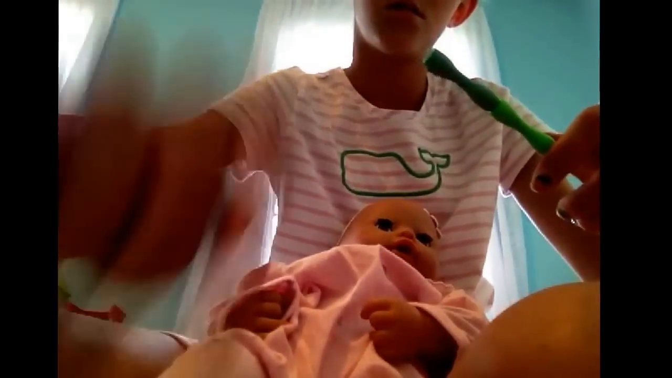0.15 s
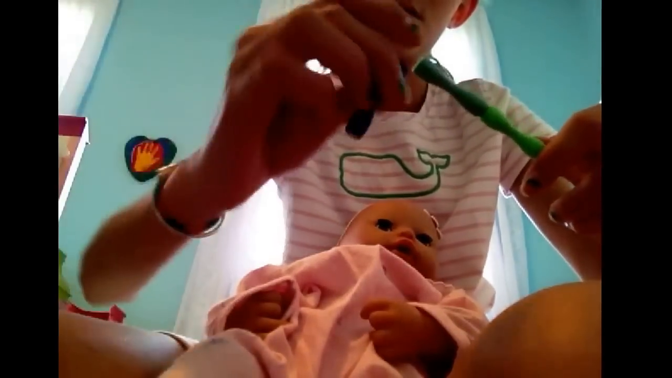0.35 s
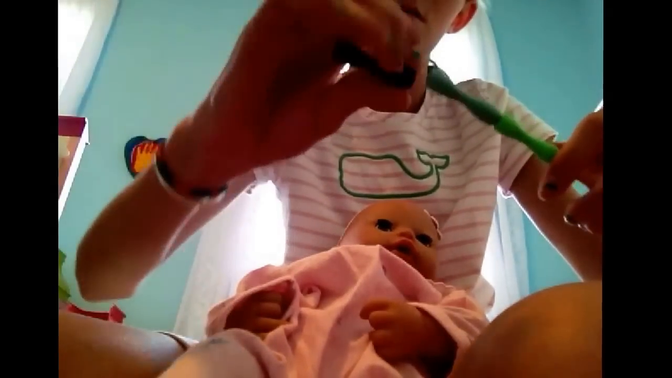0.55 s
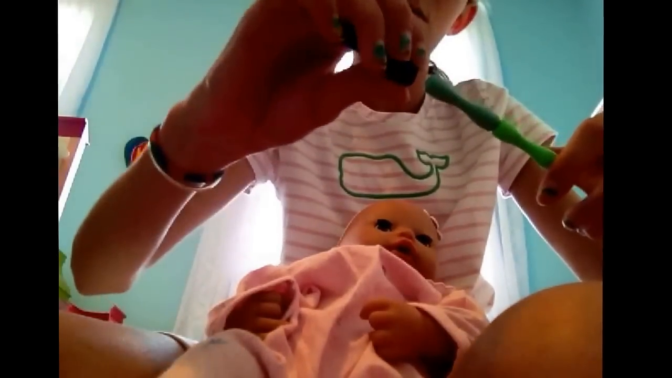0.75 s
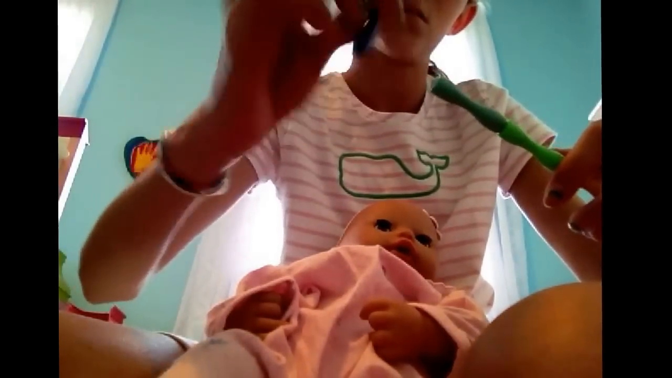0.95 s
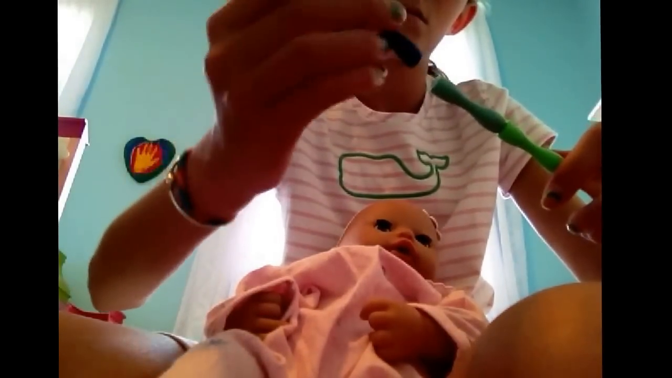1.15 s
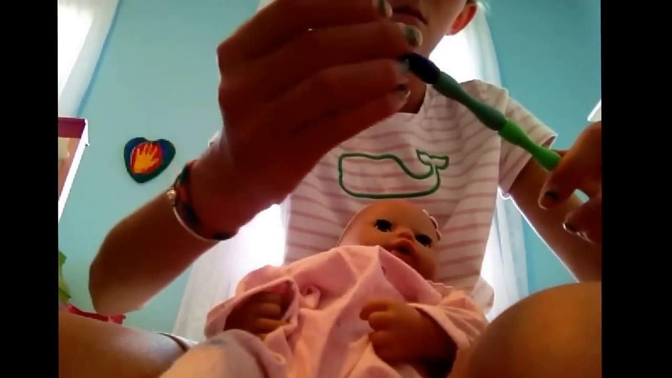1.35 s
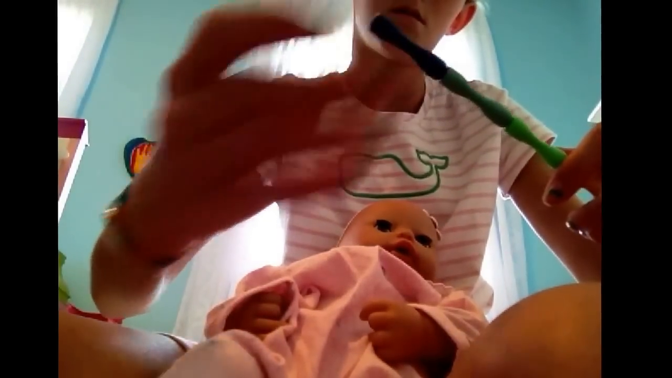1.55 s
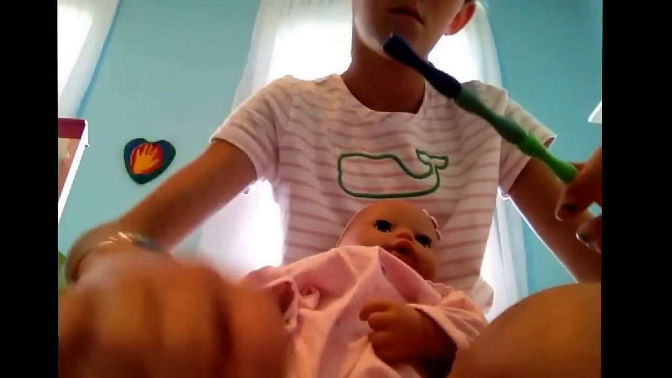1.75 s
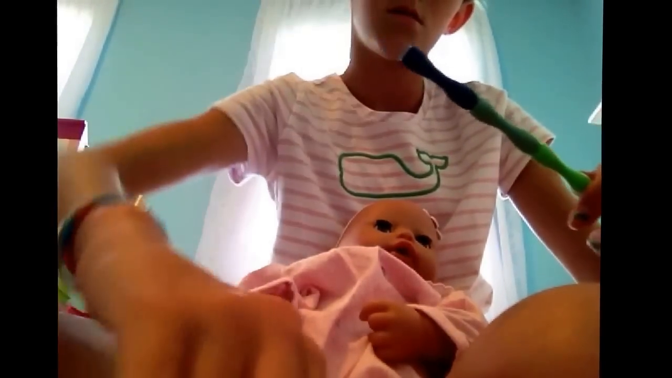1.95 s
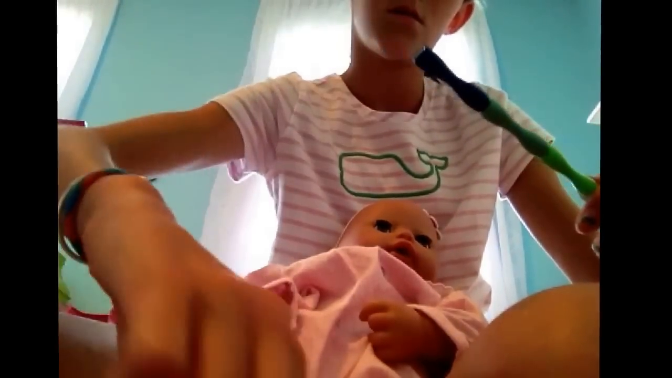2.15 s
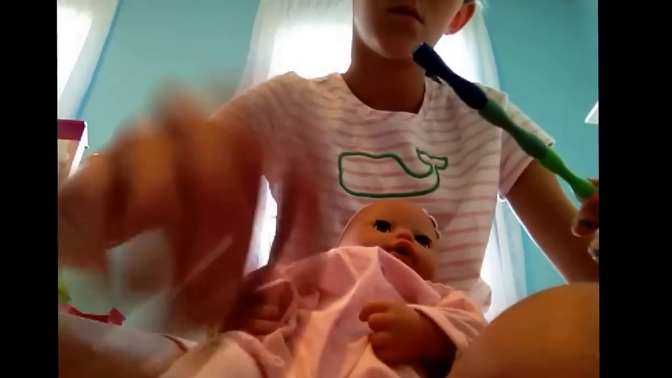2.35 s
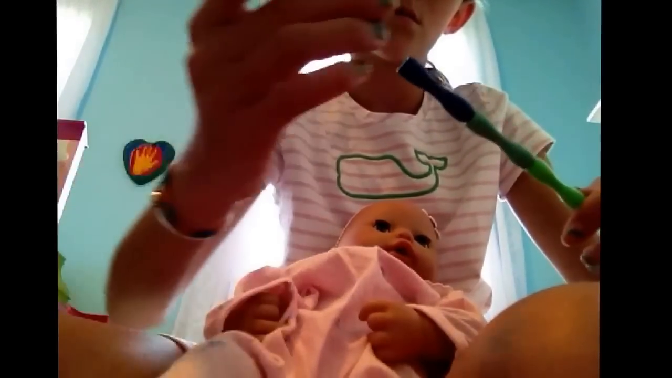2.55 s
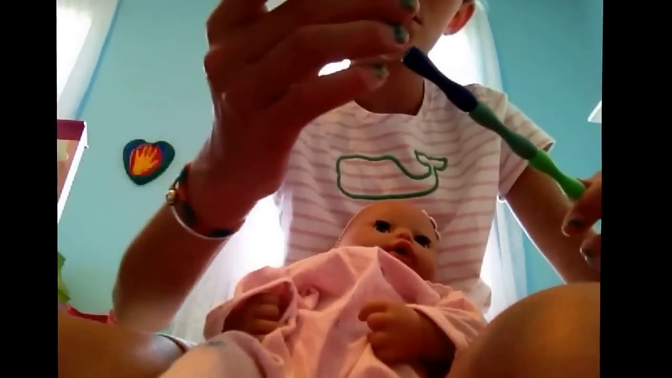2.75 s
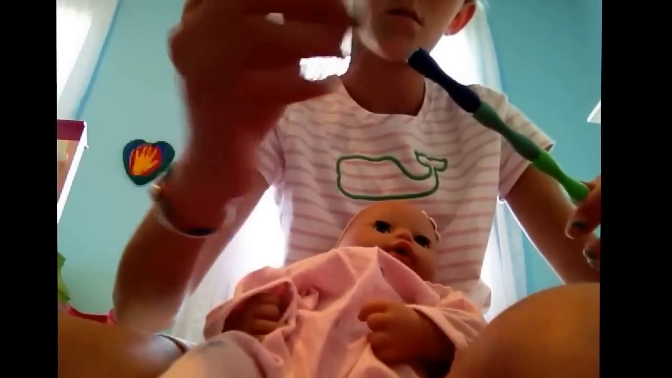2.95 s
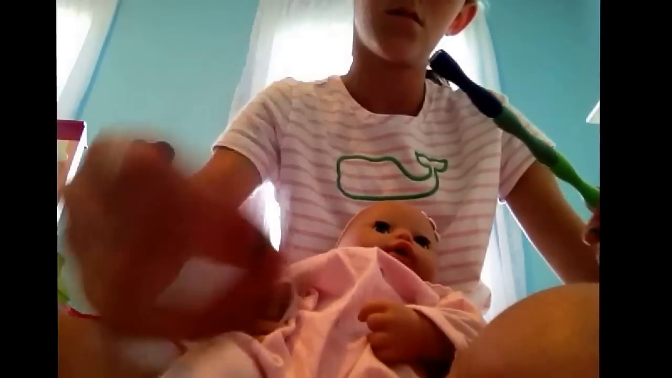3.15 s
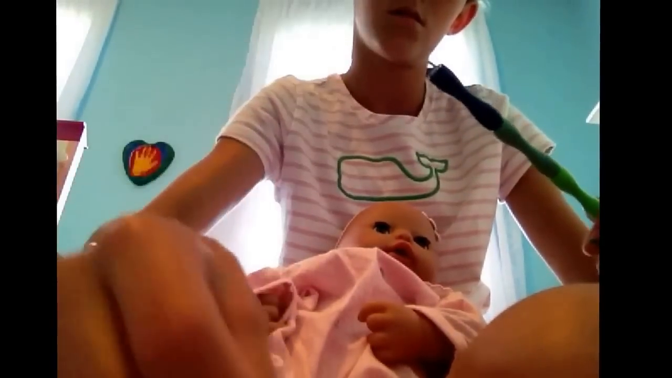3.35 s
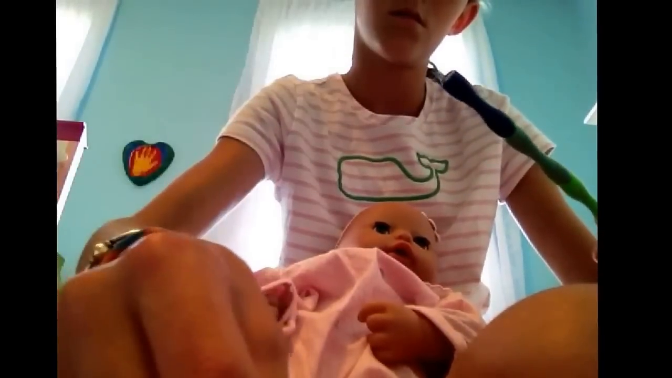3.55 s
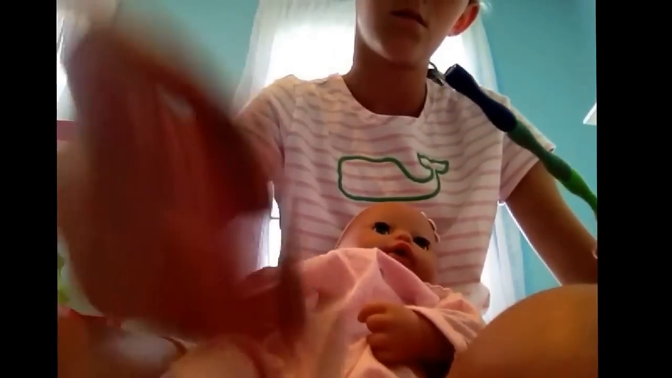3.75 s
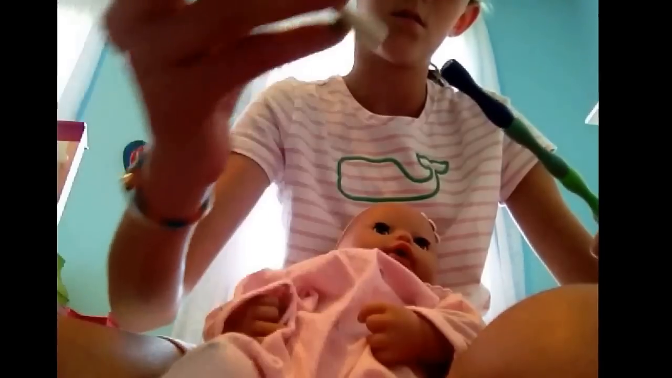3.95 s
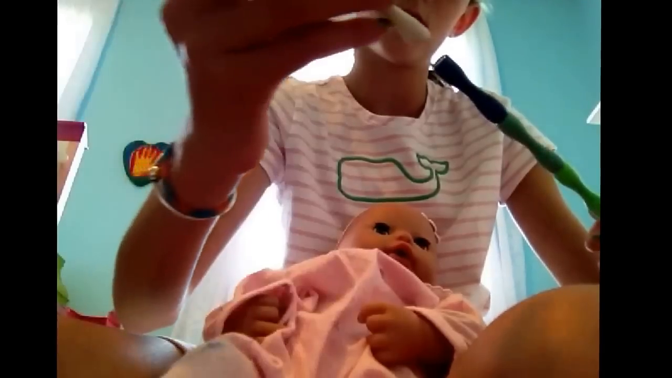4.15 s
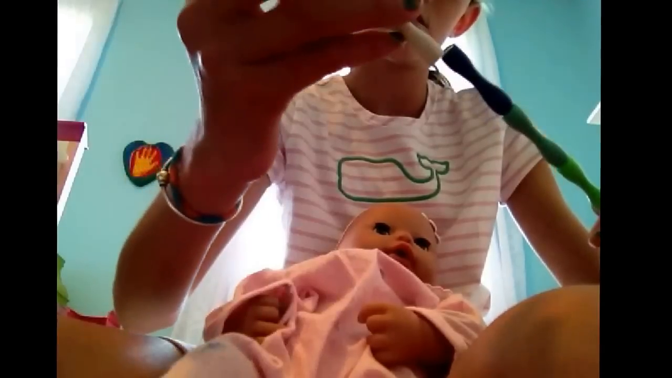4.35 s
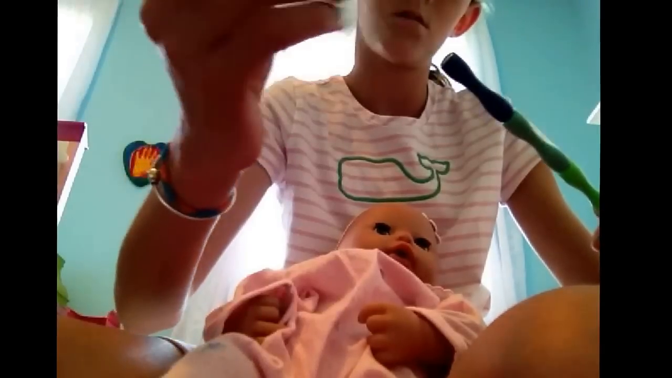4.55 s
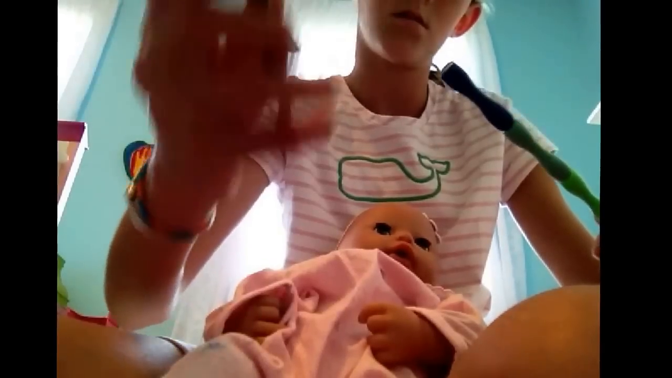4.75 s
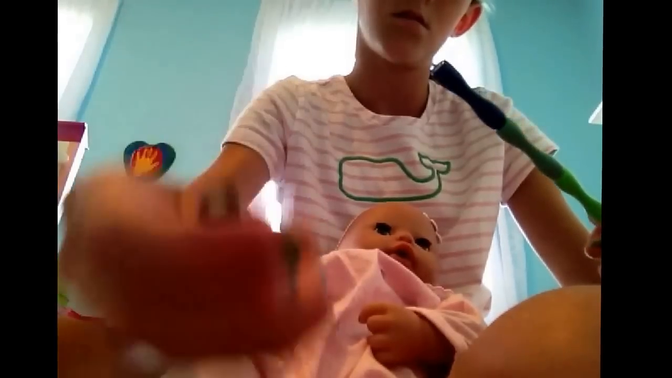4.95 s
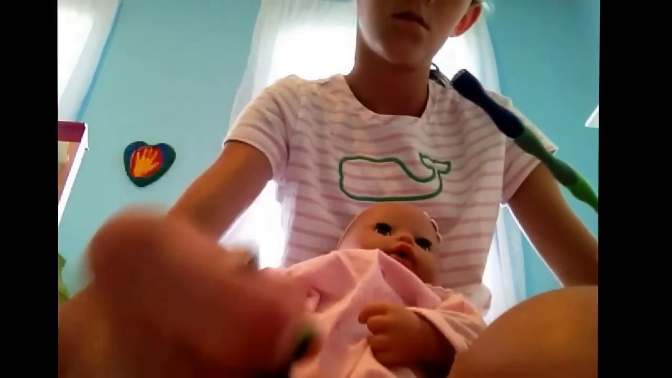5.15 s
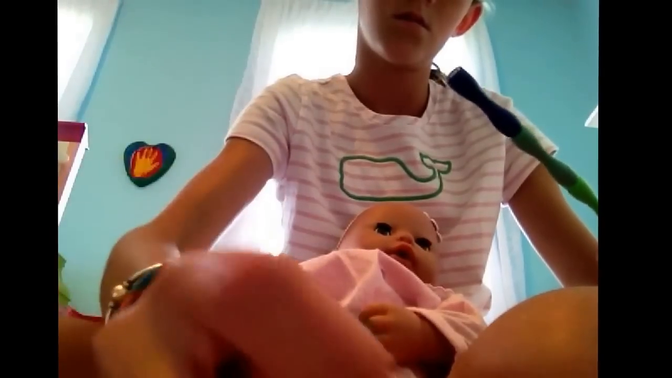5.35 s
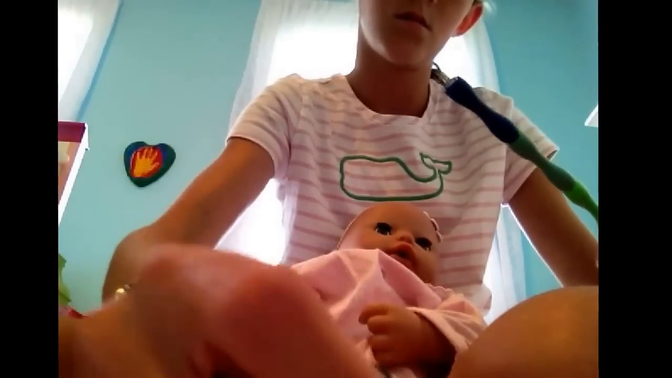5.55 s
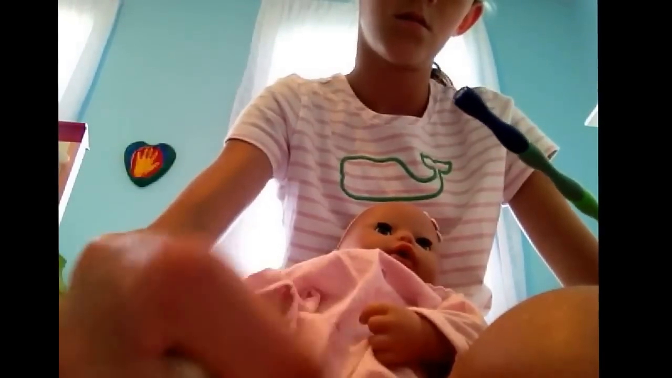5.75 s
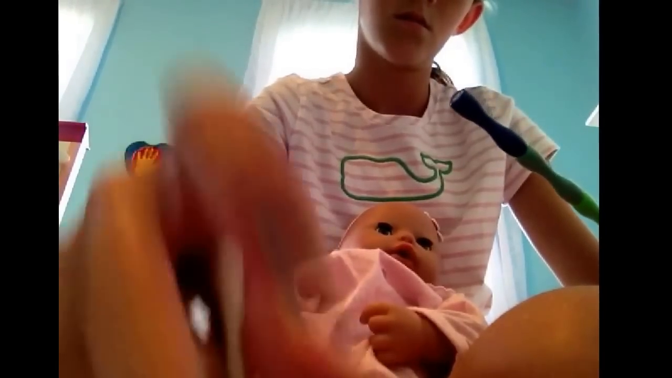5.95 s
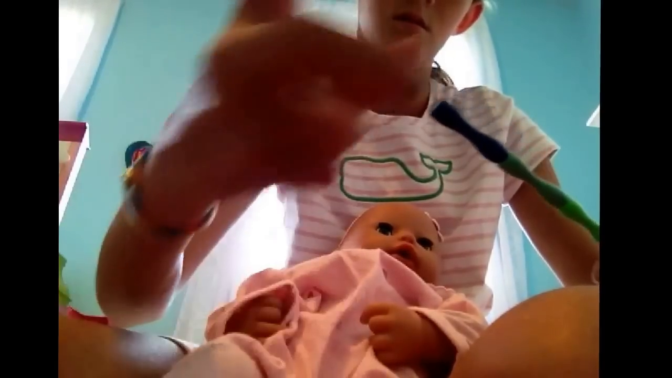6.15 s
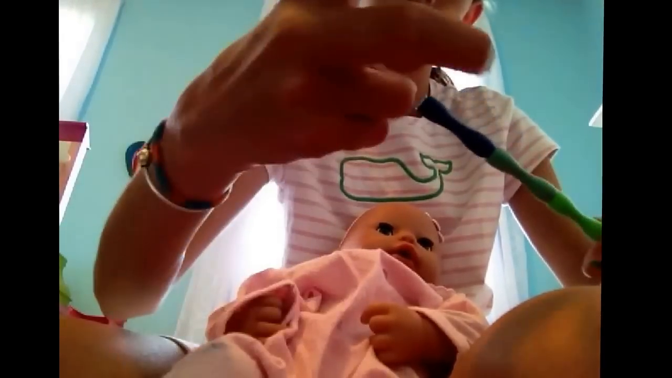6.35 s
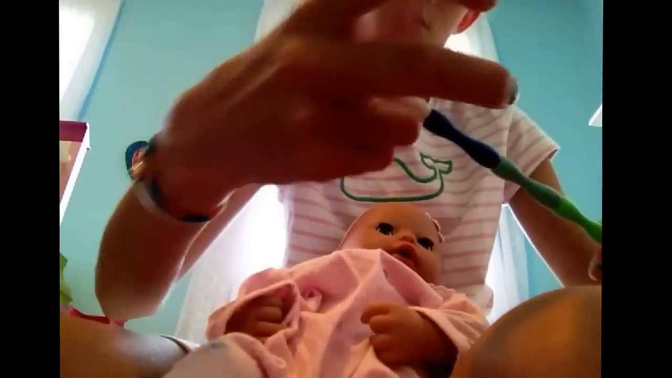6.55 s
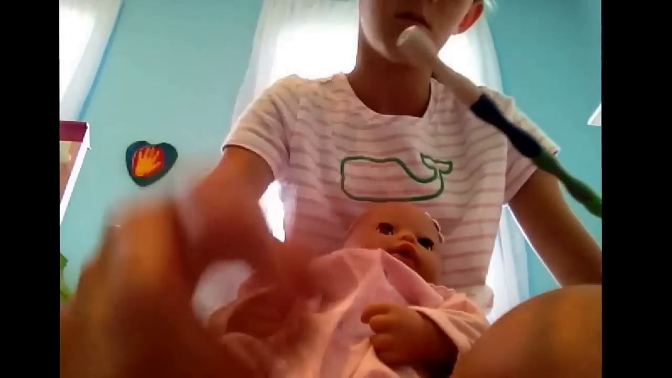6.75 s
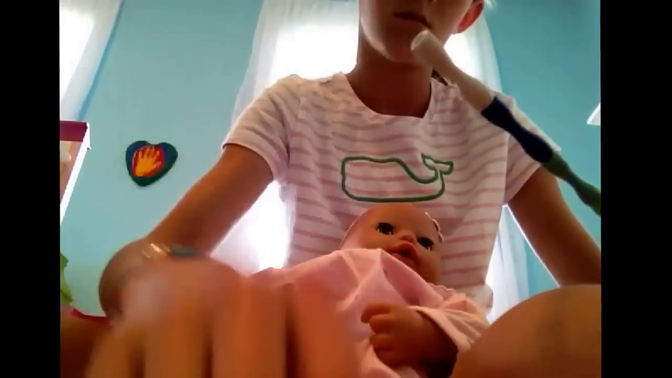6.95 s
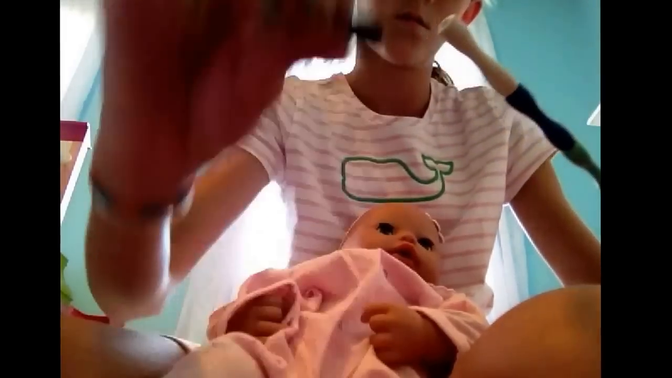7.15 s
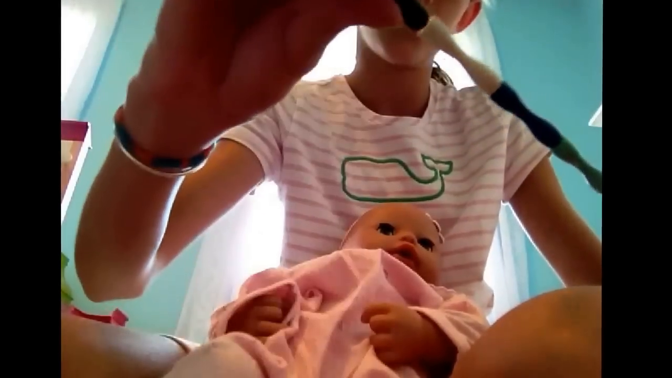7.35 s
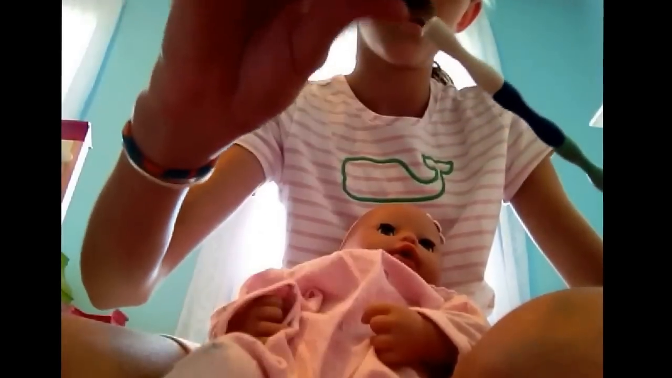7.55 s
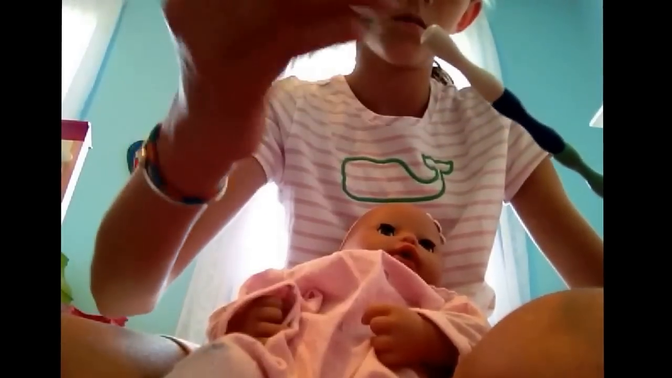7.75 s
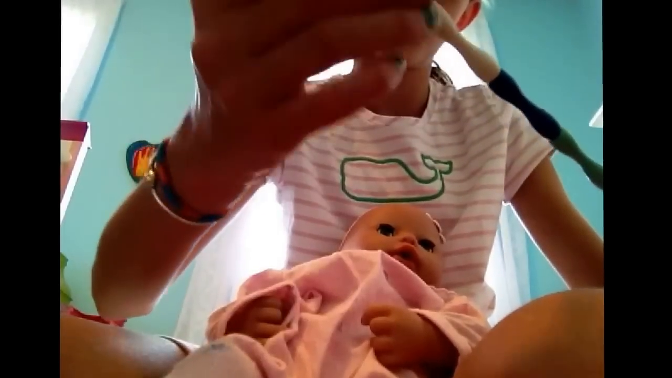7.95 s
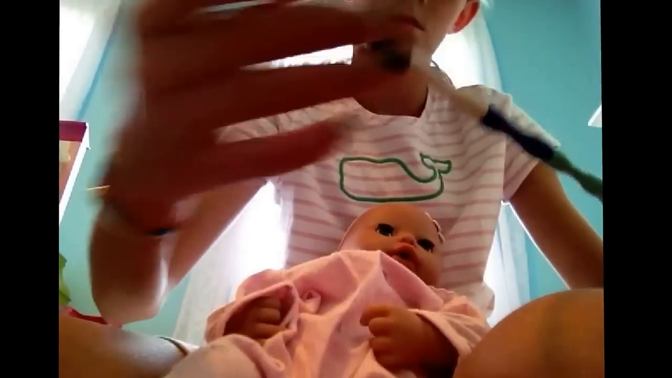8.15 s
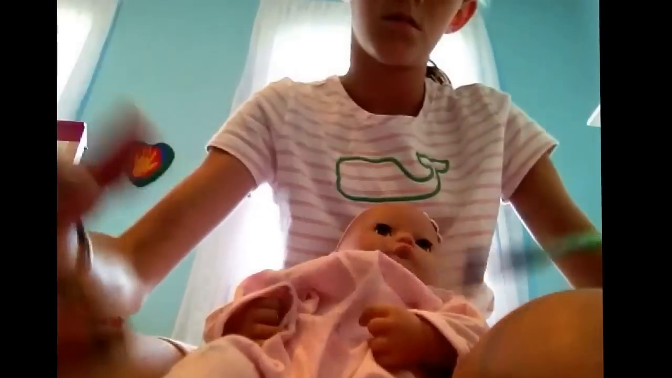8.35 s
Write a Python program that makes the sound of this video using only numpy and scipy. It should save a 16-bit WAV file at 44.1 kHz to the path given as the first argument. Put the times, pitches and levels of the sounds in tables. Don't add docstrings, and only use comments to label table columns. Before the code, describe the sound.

A quiet small bedroom, heard from a microphone close to the hands: steady low house rumble, soft hiss, no speech. Faint skin brushing and tiny nail and bracelet ticks come first, with a dull bump near 0.75 s. At 1.3 s two magnetic rod ends snap together: a loud, dry, extremely short clack, bright steel over plastic, followed by a quick reflection from the walls. Slight rustles and a knuckle knock near 1.9 s. A faint far thud at 3.1 s, then a second sharp snap at 3.4 s with a little hollow-tube ring. Sparse ticks and brushes, busier around 5.7-5.9 s. The third snap, at 6.4 s, is thinner and treble-heavy; the overall level dips slightly and slowly recovers. A loose rod rings very softly at 6.8 s, amid brushing. A longer muffled thud at 7.5 s, then the gentlest snap at 7.9 s with small knocks, fading to rumble.

```python
import sys
import numpy as np
from scipy import signal
from scipy.fft import rfft, irfft
from scipy.io import wavfile
from scipy.ndimage import uniform_filter1d

SR = 44100
rng = np.random.default_rng(int(sys.argv[2]) if len(sys.argv) > 2 else 0)


def log_audio(samples):
    frames = np.atleast_2d(samples).T
    limited = np.clip(frames, -1, 1)
    pcm = np.round(limited * 32767).astype(np.int16)
    wavfile.write(sys.argv[1], SR, pcm)


def natural_amplitude(level_db):
    exponent = np.asarray(level_db, float) / 20
    return 10 ** exponent


N = 370358

# (time [s], steel level [dB], plastic level [dB])
SNAP_CONTACTS = [
    [(1.2859, -4, -4), (1.2865, -6, -12), (1.2871, -8.5, -12), (1.2877, -3.5, -7.5), (1.2892, -16, -9.5)],
    [(3.4344, -5, -5), (3.4350, -7.5, -4), (3.4360, -3, -8), (3.4373, -7, -11.5), (3.4393, -15, -18)],
    [(6.4259, -13.5, -9.5), (6.4261, -7.5, -10.5), (6.4269, -10.5, -19), (6.4277, -8.5, -12.5),
     (6.4289, -21, -8), (6.4298, -22, -21.5)],
    [(7.9237, -12, 3.5), (7.9245, -9.5, -28), (7.9252, -9, -18), (7.9261, -15.5, -8), (7.9280, -32, -22)],
]
# (frequency [Hz], level [dB per Hz])
SNAP_COLOURS = [
    [(120, -50), (350, -30.5), (1400, -25.5), (2620, -20.5), (2880, -11), (3120, -19.5), (4450, -16),
     (5850, -24), (7330, -7.5), (9640, -12.5), (10600, -12.5), (11300, -22.5), (13700, 6), (15100, -9),
     (16400, -43.5)],
    [(210, -47), (350, -30), (1700, -10), (3070, -8), (3390, -0.5), (3730, -13), (4310, 5), (4670, -7.5),
     (5230, -5), (6040, -33.5), (7100, -9.5), (10400, -20), (13100, 1.5), (15400, -11.5), (16400, -22)],
    [(210, -65.5), (350, -36), (1510, -22.5), (1780, -21), (2060, -29), (2340, -22.5), (3390, -21.5),
     (3790, -17), (5140, -21.5), (5580, -23), (6760, -14.5), (10300, -13.5), (13500, 3), (15100, -2.5),
     (16400, -36)],
    [(330, -62), (600, -16), (2370, -20.5), (2910, -19), (4470, -3.5), (5100, -20), (6660, -12.5),
     (7270, -13), (7830, -4), (9920, -13.5), (10400, -11), (12200, -5.5), (13300, 4), (15400, -6),
     (16400, -45)],
]
# (frequency [Hz], level [dB per Hz])
WALL_COLOURS = [
    [(500, -34), (1000, -20), (2000, -20.5), (4200, -19), (4700, -9), (5200, -20.5), (7800, -10.5),
     (9000, -14.5), (12200, -12), (13100, 0), (13900, -7), (15300, -8)],
    [(500, -22.5), (1200, -29), (3300, -13), (3800, -17), (4300, -3.5), (5000, -14), (7000, -14),
     (10300, -21), (12200, -13), (13400, -0.5), (14300, -15), (15300, -17)],
    [(500, -45), (1200, -29), (3000, -20), (4300, -16.5), (5100, -16), (7000, -13), (9500, -16),
     (12200, -9), (12900, 1.5), (14200, -3), (15300, -5)],
    [(500, -25.5), (1000, -17.5), (1500, -17.5), (4400, -13.5), (5200, -15), (7000, -10.5), (8500, -16),
     (12200, -16.5), (13200, -1), (14000, -6.5), (15300, -8)],
]
# (level [dB], hollow-tube ring [dB], room [dB], gap before the walls answer [s])
SNAP_STRENGTHS = [
    (9, -46, -12.5, .012),
    (7, -26, -14, 0.01),
    (8.5, -51, -13.5, 0.013),
    (3, -68, -12, 0.0126),
]
# (frequency [Hz], level [dB], decay T60 [s])
TUBE_MODES = [(4338, -2, .04), (4183, -22, .2)]
# (delay [s], level [dB])
WALL_ECHOES = [(0.0146, -26), (0.0186, -28.5), (.026, -27.5), (.039, -34)]
# (frequency [Hz], decay T60 [s])
ROOM_DECAY = [(500, 0.31), (1500, 0.097), (4300, 0.16), (8000, .17), (11000, 0.17), (14000, 0.15)]
# (frequency [Hz], level [dB], decay T60 [s])
LOOSE_ROD_MODES = [(4250, 1.5, 0.026), (4150, -9, 0.022), (4900, 5, 0.0028), (13440, -1, 0.018),
                   (12800, -9.5, .015)]
TAP_S, TAP_DB = 6.8449, -49
# (time [s], level [dB])
NAIL_TICKS = [(.45, -76), (.8, -80), (3.555, -74), (3.98, -76), (4.08, -75), (4.945, -77), (5.395, -74)]
TICK_S, TICK_HZ, TICK_OCTAVES = 0.007, 8200, 1.6
# (time [s], length [s], level [dB])
BEAD_CHINKS = [(.36, .02, -81), (1.84, .012, -80), (2.145, .03, -81.5), (2.365, 0.021, -78),
               (3.78, .012, -84), (5.135, .08, -80.5), (5.67, .025, -77)]
CHINK_HZ, CHINK_OCTAVES = 13000, .2
# (time [s], length [s], level [dB], centre [Hz])
SKIN_BRUSHES = [(0.063, .043, -69, 1160), (.737, .1, -78, 1100), (1.778, .015, -71, 1990),
                (1.853, 0.14, -74, 1090), (5.67, .015, -77, 3700), (1.995, 0.035, -67.5, 990),
                (4.45, .046, -79, 8500), (4.469, 0.12, -73, 2680), (5.536, 0.041, -78, 1700),
                (5.80, .024, -72, 2000), (5.88, 0.046, -71, 3500), (5.896, .053, -67, 1020),
                (6.889, .087, -70.5, 1080), (6.922, 0.018, -71, 1500)]
BRUSH_OCTAVES = 1.7
# (time [s], length [s], level [dB], centre [Hz])
BODY_BUMPS = [
    (0.749, 0.096, -63, 276),
    (1.882, .007, -69, 1200),
    (2.547, .046, -77, 60),
    (5.737, 0.082, -76, 70),
    (5.909, 0.031, -62, 230),
    (6.931, .007, -60, 550),
    (7.945, 0.018, -60, 1000),
    (7.949, .005, -56, 2600),
]
BUMP_OCTAVES = 1
# (time [s], length [s], level [dB])
FAR_THUDS = [
    (3.08, .05, -63.5),
    (7.5, 0.16, -60.5),
]
THUD_HZ, THUD_OCTAVES = 173, 0.26
# (time [s], level [dB])
RUMBLE_LEVEL = [(0, -67.5), (.37, -69), (.7, -66), (1.2, -68), (1.9, -67), (3.8, -68.5), (6.3, -68.5),
                (7.6, -67.5), (8.4, -68)]
# (frequency [Hz], level [dB per Hz])
RUMBLE_SPECTRUM = [(15, -72), (25, -33), (54, -30), (75, -21.5), (104, -4), (161, 0), (199, -2), (223, -3),
                   (275, -2), (405, -11), (492, -9), (608, -15.5), (1200, -25), (1560, -57), (2640, -120)]
# (frequency [Hz], level [dB per Hz])
HISS_SPECTRUM = [(350, -28), (600, -2.5), (1400, -3), (4000, -7), (7500, -12), (9800, -16), (12500, -13),
                 (15300, -11)]
HISS_DB = -73
DUCK_AT_S, DUCK_DB, DUCK_ATTACK_S, DUCK_RELEASE_S = 6.43, -2.5, .03, 2.2


def contact_force(contacts, steel_hz=5800):
    t = np.arange(400) / SR
    steel, plastic = np.zeros((2, SR // 2))
    for s, steel_db, plastic_db in contacts:
        chatter = natural_amplitude(-13.5) * rng.standard_normal(400) * np.exp(-t / .0009)
        chatter[0] = 1
        since_first = s - contacts[0][0]
        add(steel, natural_amplitude(steel_db) * chatter, since_first)
        add(plastic, natural_amplitude(plastic_db) * chatter, since_first)
    return filtered(steel, 2, steel_hz, "high") + filtered(plastic, 2, steel_hz, "low")


def snap(contacts, colour, wall_colour, strength):
    level_db, tube_db, room_db, gap_s = strength
    hz = np.arange(1025) * SR / 2048
    force = contact_force(contacts)
    force_db = 10 * np.log10(uniform_filter1d(abs(rfft(force[:2048])) ** 2, size=17))
    rods = natural_amplitude(19.5) * causal(at_hz(colour, hz) - force_db)
    direct = signal.fftconvolve(force, rods)[:SR // 2]

    click = np.zeros(SR // 2)
    click[0] = natural_amplitude(tube_db)
    tube = ring_modes(click, TUBE_MODES)

    to_walls = natural_amplitude(5) * tube
    add(to_walls, natural_amplitude(14) * causal(at_hz(wall_colour, hz)), 0)
    wet = natural_amplitude(room_db) * room(to_walls, gap_s)
    for delay_s, db in WALL_ECHOES:
        add(wet, natural_amplitude(db + rng.normal(0, 2.0)) * direct, delay_s)
    return natural_amplitude(level_db - 13) * filtered(direct + tube + wet, 2, 300, "high")


def room(x, gap_s):
    t = np.arange(len(x)) / SR
    response = np.zeros(len(x))
    edges = np.geomspace(400, 17000, num=13)
    for low, high in zip(edges, edges[1:]):
        band = filtered(rng.standard_normal(len(x)), 2, [low, high], "band")
        fall_db = 60 * t / at_hz(ROOM_DECAY, np.sqrt(low * high))
        late_tail = natural_amplitude(-32.5 - 0.44 * fall_db)
        response += band * (natural_amplitude(-fall_db) + late_tail)
    walls = np.clip((t - gap_s) / .003 + 1, natural_amplitude(-12.5), 1)
    scatter = natural_amplitude(13.0) * np.exp(-t / 0.0031)
    return signal.fftconvolve(x, response * (walls + scatter) * natural_amplitude(-18.5))[:len(x)]


def tap():
    click = np.zeros(SR // 4)
    click[0] = natural_amplitude(TAP_DB)
    rod = filtered(ring_modes(click, LOOSE_ROD_MODES), 4, 3600, "high")
    return rod + natural_amplitude(-25) * room(rod, .011)


def hands():
    rubs = [(s, TICK_S, db, TICK_HZ, TICK_OCTAVES) for s, db in NAIL_TICKS]
    rubs += [(*row, CHINK_HZ, CHINK_OCTAVES) for row in BEAD_CHINKS]
    rubs += [(*row, BRUSH_OCTAVES) for row in SKIN_BRUSHES]
    rubs += [(*row, BUMP_OCTAVES) for row in BODY_BUMPS]
    rubs += [(*row, THUD_HZ, THUD_OCTAVES) for row in FAR_THUDS]
    out = np.zeros(N + SR)
    for s, *shape in rubs:
        add(out, rub(*shape), s)
    return out[SR // 4:SR // 4 + N]


def rub(length_s, db, hz, octaves):
    edges = np.clip(hz * 2 ** (np.array([-.5, .5]) * octaves), 20, 16000)
    grain_db = 3.5 * np.repeat(rng.standard_normal(SR // 50), repeats=50)
    grains = rng.standard_normal(SR) * natural_amplitude(grain_db)
    noise = rms_one(filtered(grains, 2, edges, "band")[SR // 2:])
    t = np.arange(SR // 2) / SR - .25
    swell = np.exp(-2 * (t / length_s) ** 2)
    return natural_amplitude(db) * rms_one(noise * swell) * np.sqrt(np.mean(swell ** 2))


def background():
    s, level_db = np.transpose(RUMBLE_LEVEL)
    rumble = natural_amplitude(np.interp(np.arange(N) / SR, s, level_db)) * coloured(RUMBLE_SPECTRUM)
    return rumble + natural_amplitude(HISS_DB) * coloured(HISS_SPECTRUM)


def coloured(spectrum):
    hz = np.arange(N // 2 + 1) * SR / N
    return rms_one(irfft(rfft(rng.standard_normal(N)) * natural_amplitude(at_hz(spectrum, hz)), N))


def ring_modes(click, modes):
    out = np.zeros(len(click))
    for hz, db, t60 in modes:
        r, w = natural_amplitude(-60 / (t60 * SR)), 2 * np.pi * hz / SR
        out += natural_amplitude(db) * signal.lfilter([0, np.sin(w)], [1, -2 * r * np.cos(w), r * r], click + 1e-18)
    return out


def causal(db):
    cepstrum = irfft(np.log(natural_amplitude(db)), 2048)
    cepstrum[1:1024] *= 2
    cepstrum[1025:] = 0
    return irfft(np.exp(rfft(cepstrum)), 2048)


def filtered(x, order, hz, kind):
    return signal.sosfilt(signal.butter(order, hz, kind, fs=SR, output="sos"), x)


def at_hz(points, hz):
    table_hz, values = np.transpose(points)
    return np.interp(np.log(hz + 1e-9), np.log(table_hz), values)


def rms_one(x):
    return x / np.sqrt(np.mean(x ** 2) + 1e-20)


def add(out, sound, s):
    i = max(round(s * SR), 0)
    out[i:i + len(sound)] += sound[:len(out) - i]


def scene():
    out = background()
    for contacts, colour, wall_colour, strength in zip(SNAP_CONTACTS, SNAP_COLOURS, WALL_COLOURS, SNAP_STRENGTHS):
        add(out, snap(contacts, colour, wall_colour, strength), contacts[0][0])
    add(out, tap(), TAP_S)
    return (out + hands())[None]


def low_pass(x):
    return signal.sosfilt(signal.butter(12, 16540, fs=SR, output="sos"), x)


def record(dry):
    top_cut = signal.ellip(8, .5, 30, 15330, fs=SR, output="sos")
    since = np.maximum(np.arange(N) / SR - DUCK_AT_S, 0)
    duck = (1 - np.exp(-since / DUCK_ATTACK_S)) * np.exp(-since / DUCK_RELEASE_S)
    return low_pass(signal.sosfilt(top_cut, natural_amplitude(DUCK_DB * duck) * dry))


dry = scene()
out = record(dry)
log_audio(out)
```